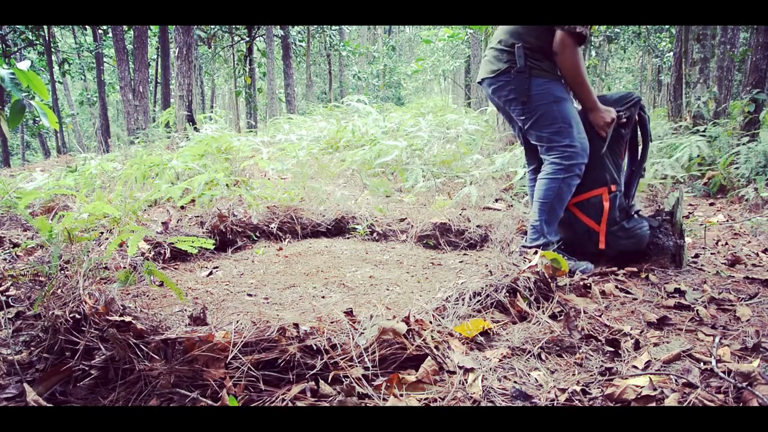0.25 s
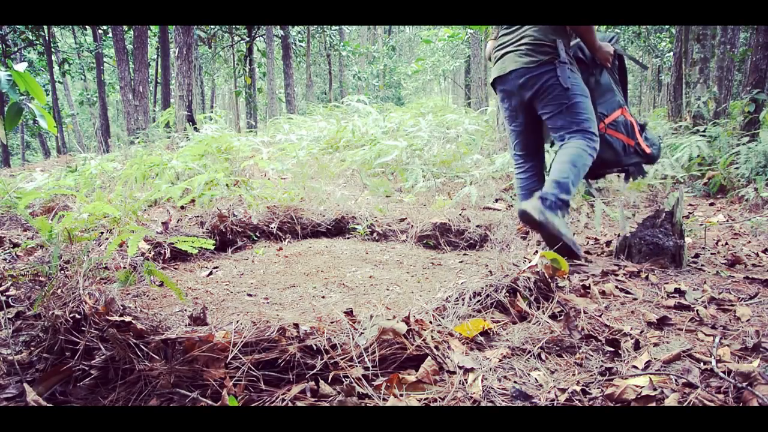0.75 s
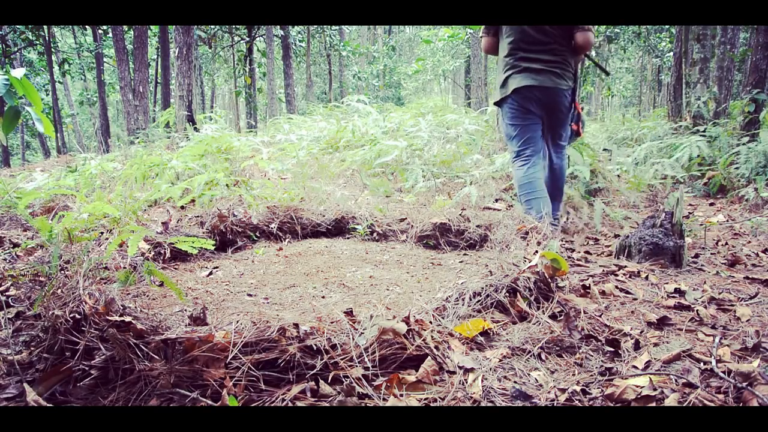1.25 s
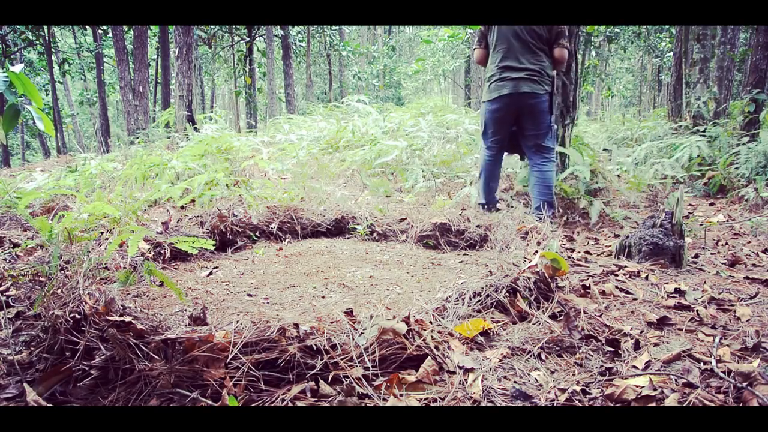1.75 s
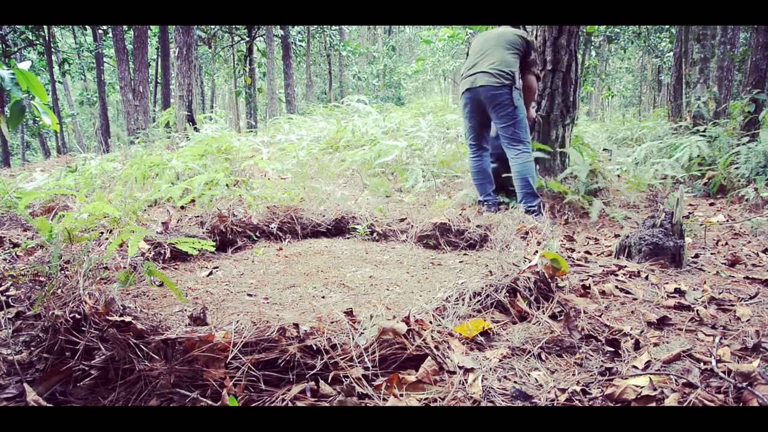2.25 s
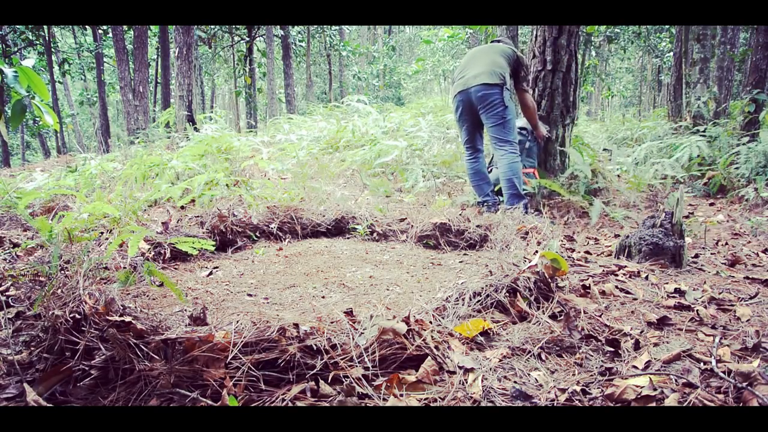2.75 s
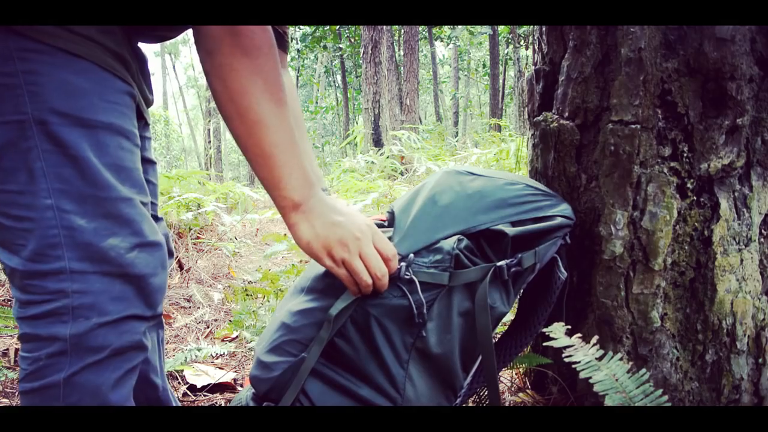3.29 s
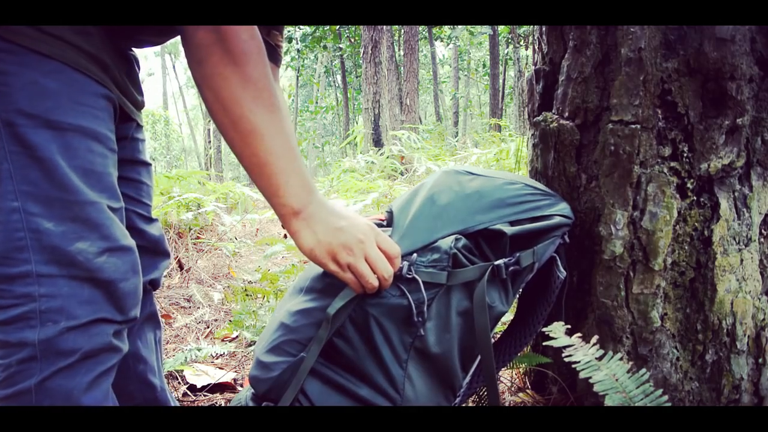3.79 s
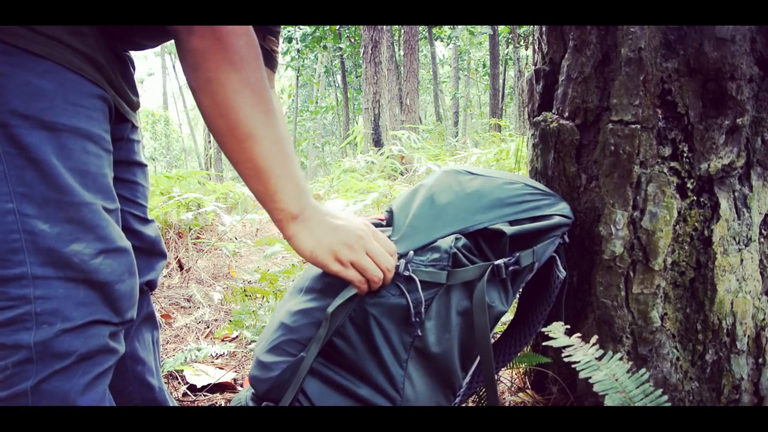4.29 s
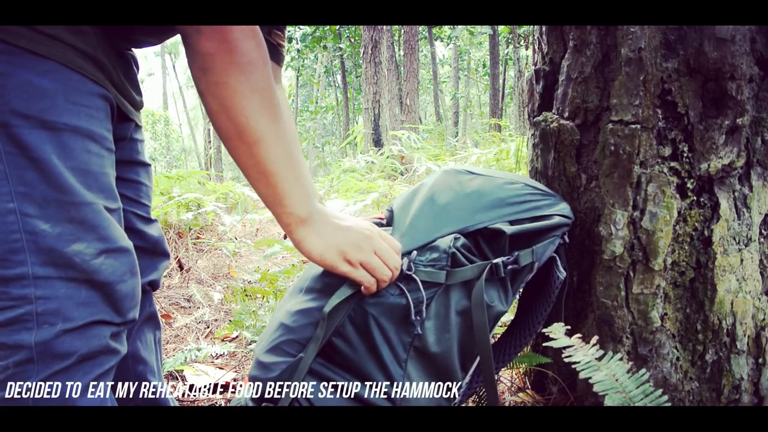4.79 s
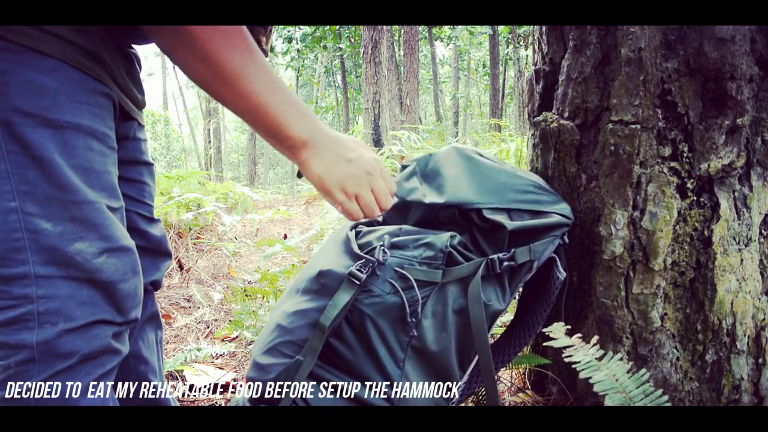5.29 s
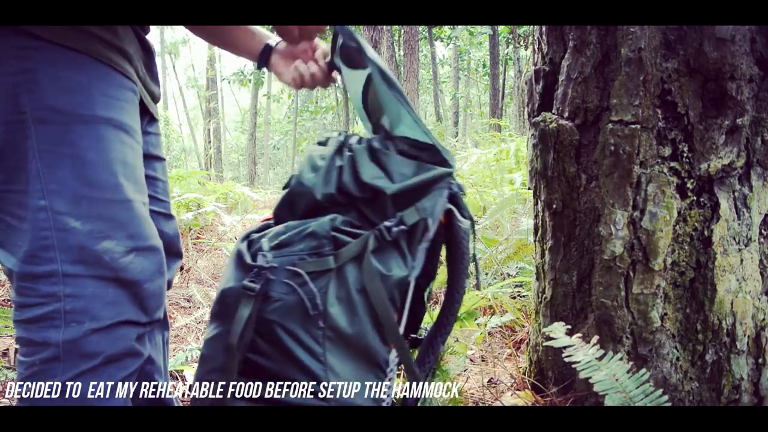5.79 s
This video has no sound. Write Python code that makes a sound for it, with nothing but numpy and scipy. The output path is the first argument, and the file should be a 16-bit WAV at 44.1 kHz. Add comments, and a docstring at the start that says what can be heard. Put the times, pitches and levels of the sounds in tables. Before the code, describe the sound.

Boots scuff through dry needles, then a rucksack buckle clicks and its nylon lid rustles, under high whining cicadas in a forest.

```python
"""Someone lifts a rucksack and scuffs through dry pine needles and leaves, which crunch and snap.
At about 3 s they set it down by a tree. Near 4.7 s, close by, a plastic buckle is pressed open
with a click; then the nylon lid is folded back, rubbing over itself. All along, cicadas buzz their
drum-like skins overhead in long rising notes, over a throbbing insect chorus, a cricket and the
hush of the forest."""
import sys
import numpy as np
from scipy import signal
from scipy.fft import rfft, irfft
from scipy.io import wavfile
from scipy.ndimage import uniform_filter1d

SR = 44100
rng = np.random.default_rng(int(sys.argv[2]) if len(sys.argv) > 2 else 0)


def int16_out(signal):
    """Quantize to a 16-bit WAV file."""
    q = np.round(np.clip(np.atleast_2d(signal).T, -1, 1) * 32767)
    wavfile.write(sys.argv[1], SR, q.astype(np.int16))


N = 266352
TIME = np.arange(N) / SR
WALK_END_S = 2.95

# Levels in the tables are starting points: most functions add a gain of their own. boots and the lifted pack
# scuffing through the litter: peak_s, rise_s, fall_s, press_db, crunch_db, hiss_db
SCUFFS = [(.11, 0.09, 0.29, -54.5, -58, -52), (.325, 0.14, 0.082, -44.5, -38.5, -49),
          (.63, 0.083, 0.1, -56, -47.5, -51), (.875, 0.0083, .05, -65, -47, -67),
          (1.185, 0.031, 0.081, -45.5, -47, -45), (1.265, 0.082, 0.051, -50, -42.5, -41),
          (1.4, 0.13, 0.073, -47.5, -40.5, -45.5), (1.515, .025, 0.093, -49, -45, -50),
          (1.62, 0.018, 0.083, -45, -41.5, -39.5), (1.721, 0.058, 0.043, -56, -36.5, -35.5),
          (1.925, 0.034, 0.19, -57, -50.5, -50), (2.315, .08, 0.068, -57, -54, -45),
          (2.78, 0.27, 0.23, -52, -45, -45), (2.93, 0.094, 0.039, -50, -47.5, -45.5)]
# tone of the low, middle and high layer of a rustle, each: frequency_hz, gain_db
PRESS_COLOUR = [(60, -4), (150, 1.5), (300, 6.5), (700, 7), (1300, 6), (2400, 0), (5000, -38)]
CRUNCH_COLOUR = [(700, -30), (1500, -13.5), (2400, -2.5), (3800, 1), (5500, -2), (8000, -4), (12000, -13)]
HISS_COLOUR = [(3500, -10), (6000, -3.5), (8000, 0), (10500, 0.5), (13000, 2.5), (16000, -21)]
# needles giving way under the heel: start_s, level_db, centre_hz, decay_s (time to fall 60 dB)
HEEL_CRUNCHES = [(1.561, -32.5, 650, .08), (1.584, -34, 820, .07), (1.637, -36, 680, .08)]
# twigs, leaves, cloth and strap ends snapping: start_s, level_db, centre_hz
SNAPS = [(.329, -32, 680), (.863, -33, 5000), (1.262, -28, 750), (1.265, -32, 7000), (1.41, -27, 3400),
         (1.452, -32, 1500), (1.513, -39, 4000), (1.526, -28, 5000), (1.621, -25.5, 4520),
         (1.745, -21, 7000), (1.919, -24, 5000), (2.699, -30, 1690), (2.754, -22, 10000),
         (2.905, -30, 3000), (3.029, -36, 3500), (5.458, -23, 10500), (5.568, -26.5, 2980),
         (5.654, -23, 1300), (5.793, -21.5, 1470), (5.814, -25, 1010)]
# dull knocks of the pack and its fittings: start_s, level_db, pitch_hz, decay_s
KNOCKS = [(0.331, -42, 261, 0.027), (4.335, -26.5, 650, 0.02), (4.336, -28, 278, 0.03),
          (5.568, -28, 244, 0.036), (5.574, -32, 130, 0.041), (5.793, -32, 550, 0.0079),
          (5.7931, -18.5, 2070, 0.0088)]
# the buckle letting go and bouncing: start_s, level_db
BUCKLE_HITS = [(4.6677, -12), (4.6687, -35), (4.6716, -24.5)]
# tones the buckle rings with: pitch_hz, level_db, decay_s
BUCKLE_TONES = [(304, -5.5, 0.013), (615, 2, 0.0049), (1070, -3, 0.0048), (2080, -6.5, 0.0067),
                (3660, -2.5, 0.0028), (8600, 0, 0.0022), (10400, -13, 0.0034)]
# pulls on the nylon lid: peak_s, rise_s, fall_s, fold_db, rub_db, hiss_db
LID_PULLS = [(5.475, 0.049, 0.093, -53, -50, -47), (5.56, 0.022, 0.038, -48.5, -44, -45),
             (5.645, 0.039, .08, -50, -45, -39), (5.78, 0.088, 0.096, -48, -43, -44.5),
             (5.87, .04, 0.084, -49, -49, -42.5), (5.934, 0.019, 0.041, -46, -38.5, -36),
             (6.003, 0.019, .025, -50, -43.5, -42)]
# near cicada's notes; root is the lowest tone, second and third are 2 and 3 times its pitch:
# start_s, end_s, first_second_climb_hz, root_db, second_db, third_db, third_db_per_s, root_dip_db
CICADA_NOTES = [(-.87, .23, 47.3, -52.5, -72, -49.5, 0, 0), (1.34, 2.56, 48.0, -53.5, -72, -59, 10, 0),
                (3.88, 6.2, 50.2, -48.3, -68, -53.5, -4.5, 19)]
# its whine, one curve per note: time_s, level_db, left_over_right_db
WHINE_CURVES = [
    [(0.0, -42.5, 8), (0.212, -48, 6), (0.26, -48, 6.0)],
    [(1.38, -52, 0.0), (1.44, -40.5, 7.0), (1.556, -47, -2.5), (1.626, -36.5, 1), (2.004, -49, 3.0),
     (2.088, -42, 10), (2.532, -41, 3), (2.58, -65, 5.0)],
    [(3.92, -47, 2.0), (4.03, -39.5, 3.5), (4.08, -28, 25), (4.18, -37.5, -5), (4.41, -28.5, 6.5),
     (4.5, -37, -5), (4.61, -32.5, 22), (4.65, -44, -1), (5.15, -29.5, 11), (5.3, -35.5, 11),
     (5.39, -32.5, -7), (5.45, -35.5, 11), (5.93, -36.5, 7), (6.04, -25, 17)],
]
# weaker tones around the whine, counted from its pitch and level: offset_hz, level_db
SIDE_TONES = [(-7800, -36), (-3895, -20), (-352, -20), (-170, -26), (175, -24), (350, -27)]
# faint whines: the row starting at 1.4 s is a thin rising side tone just below the near cicada's
# whine during its second note; the rest are farther cicadas:
# start_s, end_s, first_root_hz, last_root_hz, level_db
FAINT_WHINES = [(-.1, .62, 3110, 3132, -46.5), (.6, 2.3, 3266, 3216, -49), (2.3, 4.3, 3205, 3142, -56),
                (1.1, 2.95, 3084, 3126, -50), (2.95, 4.4, 3082, 3116, -46), (4.4, 6.1, 3085, 3110, -54),
                (1.4, 2.5, 2938, 2963, -49), (-.1, .25, 3068, 3072, -47)]
# bands of the insect chorus: centre_hz, width_hz, level_db
CHORUS_BANDS = [(7258, 826, -1), (14530, 1300, -7), (12070, 420, -11), (3147, 200, -19.5)]
# a faint far hum: start_s, end_s, fade_s, level_db, pitch_hz
FAR_HUM = (-0.7, 2.5, 1.8, -58, 440)
# tone of the air in the trees: frequency_hz, gain_db
HUSH_COLOUR = [(20, -41), (40, -6.5), (80, 3.5), (200, 1), (500, -0.5), (1200, -2), (2500, -5),
               (5000, -6.5), (10000, -4.5), (16000, -8.5)]
# how alike the two ears hear a noise: frequency_hz, likeness (0 unrelated, 1 the same)
EAR_LIKENESS = [(60, 0.86), (500, 0.38), (2000, 0.35), (5000, 0.22), (9000, 0), (15000, 0.034)]


def boots(press_db=2.0, crunch_db=4.5, hiss_db=8.5, stir_db=(-61, -54.5, -62.5), hiss_db_per_s=2.5):
    """The sole packs the ground, leaves crunch and dry needles hiss against each other."""
    stir = np.outer(from_db(stir_db), np.ones(N))  # soft rustle between scuffs
    stir[2] *= from_db(hiss_db_per_s * TIME)
    press, crunch, hiss = np.sqrt(stroke_power(SCUFFS) + stir ** 2) * (TIME < WALK_END_S)
    sole = coloured(grains(1500, size_db=1.5, smooth=0.56, clump_db=1.5), PRESS_COLOUR)
    leaves = coloured(grains(3500, size_db=2.0, smooth=1.0, clump_db=1.0), CRUNCH_COLOUR)
    needles = coloured(grains(6000, size_db=-1.5, smooth=0.27, clump_db=0.7), HISS_COLOUR)
    return (press * from_db(press_db) * sole
            + crunch * from_db(crunch_db) * leaves
            + hiss * from_db(hiss_db) * needles)


def heel(width=1.5):
    """Pockets in the mat of needles collapse, each with a short hollow crunch."""
    out, t = np.zeros((2, N)), TIME[:SR // 10]
    for start_s, db, hz, decay_s in HEEL_CRUNCHES:
        cracks = rng.standard_normal(len(t)) + 0.57 * rng.standard_normal((2, len(t)))
        hollow = rms_one(band(cracks, hz / width, hz * width))
        add(out, start_s, from_db(db) * hollow * decay(t, decay_s))
    return out


def snaps(decay_s=0.014, stereo_spread=0.48):
    """Each snap is a sharp crack of noise that dies in a few milliseconds."""
    out, t = np.zeros((2, N)), TIME[:SR // 20]
    for start_s, db, hz in SNAPS:
        noise = rng.standard_normal(len(t)) + stereo_spread * rng.standard_normal((2, len(t)))
        crack = band(noise * decay(t, decay_s), hz / 2, hz * 2)
        add(out, start_s, from_db(db) * crack / np.abs(crack).max())
    return out


def knocks():
    """Soft blows on the pack ring only briefly."""
    out = np.zeros((2, N))
    for start_s, db, hz, decay_s in KNOCKS:
        add(out, start_s, from_db(db) * ring(hz, decay_s))
    return band(out, 61, 1900)


def buckle(left_db=2.5, scrape_db=-24, scrape_s=0.037):
    """The plastic prongs scrape past their catch, spring free and bounce, muffled by the hand."""
    out, t = np.zeros((2, N)), TIME[:SR // 20]
    click = sum((-1) ** k * from_db(db) * ring(hz, decay_s)
                for k, (hz, db, decay_s) in enumerate(BUCKLE_TONES))
    for start_s, db in BUCKLE_HITS:
        add(out, start_s, from_db(db) * click)
    scrape = band(rng.standard_normal((2, len(t))), 500, 16000, order=1) * decay(t, scrape_s)
    add(out, BUCKLE_HITS[0][0], from_db(scrape_db) * scrape)
    return out * pan(left_db)


def nylon_lid(fold_db=4.5, rub_db=6.0, hiss_db=7.0, left_db=0.5):
    """Stiff cloth folds and its weave rubs over itself with every pull."""
    out = np.zeros((2, N))
    levels = np.sqrt(stroke_power(LID_PULLS))
    colours = (PRESS_COLOUR, CRUNCH_COLOUR, HISS_COLOUR)
    for level, db, colour in zip(levels, (fold_db, rub_db, hiss_db), colours):
        weave = grains(4000, size_db=1.5, smooth=0.83, clump_db=1.5)
        out += level * from_db(db) * coloured(weave, colour)
    return out * pan(left_db)


def near_cicada(start_hz=2998, dip_hz=3048.5, dip_width_hz=7.7, flutter_hz=7, rasp=0.095):
    """A drum-like skin buzzes ever faster in each note; the body whines at four times that pitch."""
    pitch, root, second, third = np.full(N, float(start_hz)), 0, 0, 0
    for start, end, climb_hz, root_db, second_db, third_db, third_db_per_s, dip_db in CICADA_NOTES:
        age = np.maximum(TIME - start, 0)
        pitch = np.where(age > 0, start_hz + climb_hz * np.sqrt(age), pitch)
        note = held(start, end, attack_s=0.077, release_s=0.047)
        dip = np.exp(-((pitch - dip_hz) / dip_width_hz) ** 2)  # peaks as the pitch passes dip_hz
        root += note * from_db(root_db - dip_db * dip)
        second += note * from_db(second_db + 11 * np.minimum(age, 1.27))  # grows for 1.27 s
        third += note * from_db(third_db + third_db_per_s * age)
    whine = sum(gate * from_db(db) * pan(left_db) for gate, db, left_db in map(in_time, WHINE_CURVES))
    phase = phase_of(pitch * (1 + .00015 * drift(40)))
    ear_flutter = np.array([drift(flutter_hz), drift(flutter_hz)])
    whine_tone = scattered(4 * phase, share=.12, rate_hz=20, apart_rad=1.8)
    out = from_db(5.5 + 3 * ear_flutter) * whine * whine_tone
    root_gain = from_db(2.5 + 2 * drift(flutter_hz))
    out += root_gain * root * scattered(phase, share=0.17, rate_hz=34, apart_rad=0.96)
    for multiple, level in ((2, second), (3, third)):
        overtone_gain = from_db(4 + 2 * drift(flutter_hz))
        out += overtone_gain * level * scattered(multiple * phase, share=.3, rate_hz=10)
    steady_whine = uniform_filter1d(whine, SR // 4)
    for offset_hz, db in SIDE_TONES:
        side_tone = scattered(4 * phase + 2 * np.pi * offset_hz * TIME, share=.45, rate_hz=12)
        out += from_db(db + 8) * steady_whine * side_tone
    return out * (1 + rasp * drift(120))  # the skin beats unevenly


def faint_whines(gain_db=1.5, root_db=-20, left_db=3):
    """Farther cicadas and one thin side tone of the near one, all blurred by the trees."""
    out = np.zeros((2, N))
    for start, end, first_hz, last_hz, db in FAINT_WHINES:
        gate, pitch = in_time([(start, first_hz), (end, last_hz)])
        phase = phase_of(pitch)
        whine = scattered(4 * phase, share=.8, rate_hz=14)
        root = from_db(root_db) * scattered(phase, share=0.23, rate_hz=14)
        out += uniform_filter1d(gate, SR // 10) * from_db(db) * (whine + root)
    return out * from_db(gain_db) * pan(left_db)


def chorus(gain_db=-39.5, flicker_db=1.03, left_db=2.0):
    """Many distant insects merge into bands of flickering hiss."""
    voices = np.zeros((2, N))
    for hz, width_hz, db in CHORUS_BANDS:
        hiss = band(rng.standard_normal((2, N)), hz - width_hz / 2, hz + width_hz / 2)
        voices += from_db(db) * rms_one(hiss)
    return voices * from_db(gain_db + flicker_db * drift(52)) * pan(left_db)


def cricket(level_db=-46, chirps_per_s=19.7, wing_hz=7350, sweep_hz=1300, octave_db=-7, left_db=7.5):
    """Each chirp is three wing strokes and a rest; the pitch falls during every stroke."""
    strokes = 4 * np.cumsum(chirps_per_s * (1 + .02 * drift(.7))) / SR
    progress = strokes % 1
    accent = np.array([.45, 1, .9, 0])[strokes.astype(int) % 4]
    force = np.sin(np.pi * progress) ** 2 * accent * from_db(1.5 * drift(20))
    phase = phase_of(wing_hz + sweep_hz * (.5 - progress) + 100 * drift(59.9))
    tone = scattered(phase, share=0.98, rate_hz=73)
    tone += from_db(octave_db) * scattered(2 * phase, share=.4, rate_hz=150)
    return rms_one(force * tone) * from_db(level_db) * pan(left_db)


def hush(level_db=-45, shelter_db=-0.5, left_db=1.0):
    """Distant air in the trees, a little quieter beside the tree where the walk ends."""
    air = coloured(rng.standard_normal((2, N)), HUSH_COLOUR)
    return from_db(level_db + shelter_db * (TIME > WALK_END_S)) * air * pan(left_db)


def far_hum(waver=0.0157):
    """A wavering tone from far away swells and fades."""
    start, end, fade_s, db, hz = FAR_HUM
    tone = np.sin(phase_of(hz * (1 + waver * drift(18.4))))
    return held(start, end, fade_s, fade_s) * from_db(db) * tone


def stroke_power(rows):
    """Each stroke swells and dies away; gives the power of the low, middle and high layer."""
    power = np.zeros((3, N))
    for peak_s, rise_s, fall_s, *levels_db in rows:
        from_peak = np.maximum((peak_s - TIME) / rise_s, (TIME - peak_s) / fall_s)
        swell = np.exp(-from_peak.clip(0, 30))
        power += np.outer(from_db(levels_db), swell) ** 2
    return power


def grains(per_s, size_db, smooth, clump_db):
    """Tiny cracks of uneven size come in clumps over a smooth rub."""
    cracks = rng.random((2, N)) < per_s / SR
    sizes = from_db(size_db * np.minimum(rng.exponential(1, (2, N)), 5))
    crackle = rms_one(cracks * sizes * rng.choice([-1, 1], (2, N)))
    return (crackle + smooth * rng.standard_normal((2, N))) * from_db(clump_db * drift(64))


def coloured(pair, colour):
    """Shape two unrelated noises into one stereo sound, more alike in the bass."""
    hz = np.arange(N // 2 + 1) * SR / N
    mid, side = rfft(pair) * from_db(at_hz(colour, hz))
    alike = at_hz(EAR_LIKENESS, hz)
    return rms_one(irfft(np.sqrt(1 + alike) * mid + np.sqrt(1 - alike) * side * [[1], [-1]], N))


def scattered(phase, share, rate_hz, apart_rad=1.73):
    """A tone reaches each ear directly and by many shifting paths off trunks and leaves."""
    ears = []
    for shift in (0, apart_rad + .15 * drift(1)):
        bounced = drift(rate_hz) * np.sin(phase) + drift(rate_hz) * np.cos(phase)
        ears.append(np.sin(phase + shift) + share * bounced)
    return rms_one(np.array(ears))


def ring(hz, decay_s):
    """The dying tone of something struck."""
    t = TIME[:SR // 10]
    return np.sin(2 * np.pi * hz * t) * decay(t, decay_s)


def decay(t, decay_s):
    """A fade that falls 60 dB in decay_s."""
    return np.exp(-np.log(1000) * t / decay_s)


def held(start, end, attack_s, release_s):
    """Fade in, hold, fade out."""
    return np.clip(np.minimum((TIME - start) / attack_s, (end - TIME) / release_s), 0, 1)


def drift(rate_hz):
    """A smooth random wobble of typical size one; a higher rate wobbles faster."""
    pole = np.exp(-80 * np.pi * rate_hz / SR)
    noise = rng.standard_normal(N // 40 + 2002)  # one value per 40 samples
    slow = signal.lfilter([1], [1, -2 * pole, pole * pole], noise)[2000:]
    return np.interp(np.arange(N) / 40, np.arange(len(slow)), rms_one(slow))


def phase_of(pitch_hz):
    """The running angle of a wave whose pitch changes."""
    return 2 * np.pi * np.cumsum(pitch_hz) / SR


def in_time(rows):
    """A gate that is open while the table lasts, then each column at every sample."""
    times, *columns = np.transpose(rows)
    gate = np.clip(np.minimum(TIME - times[0], times[-1] - TIME) * 100 + 1, 0, 1)
    return [gate] + [np.interp(TIME, times, column) for column in columns]


def at_hz(points, hz):
    """Read between a table's rows, with every octave equally wide."""
    frequencies, values = np.transpose(points)
    return np.interp(np.log(hz + 1), np.log(frequencies), values)


def band(x, low_hz, high_hz, order=2):
    """Keep what lies between two frequencies."""
    top_hz = min(high_hz, .48 * SR)
    return signal.sosfilt(signal.butter(order, [low_hz, top_hz], "band", fs=SR, output="sos"), x)


def pan(left_db):
    """Left and right gains that make the left louder by left_db."""
    gains = from_db(np.array([[.5], [-.5]]) * left_db)
    return gains / np.sqrt(np.mean(gains ** 2, axis=0))


def add(out, start_s, sound):
    """Mix a short sound in at start_s."""
    i = round(start_s * SR)
    out[:, i:i + sound.shape[-1]] += sound[..., :N - i]


def from_db(db):
    """Turn decibels into a multiplier."""
    return 10 ** (np.asarray(db) / 20)


def rms_one(x):
    """Scale to an average strength (rms) of one."""
    return x / np.sqrt(np.mean(x ** 2) + 1e-20)


def scene():
    """Insects and air all round, the walker and the pack in front."""
    forest = near_cicada() + faint_whines() + chorus() + cricket() + hush() + far_hum()
    return forest + boots() + heel() + nylon_lid() + snaps() + knocks() + buckle()


def record(dry):
    """Cut the treble steeply above 15900 Hz."""
    return signal.sosfilt(signal.ellip(12, .1, 80, 15900, fs=SR, output="sos"), dry)


dry = scene()
out = record(dry)
int16_out(out)
```